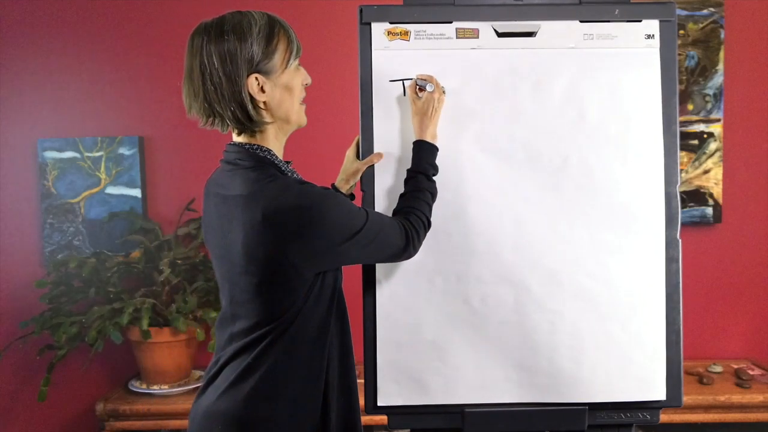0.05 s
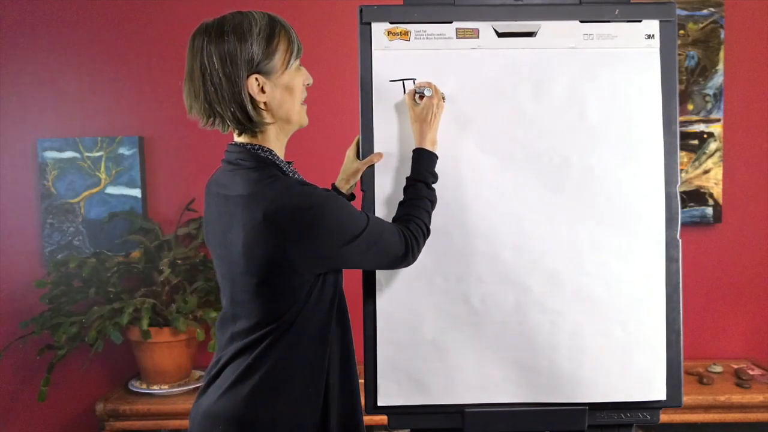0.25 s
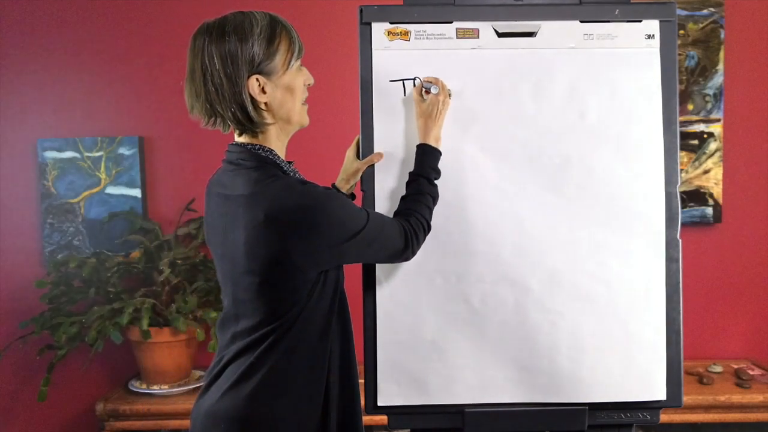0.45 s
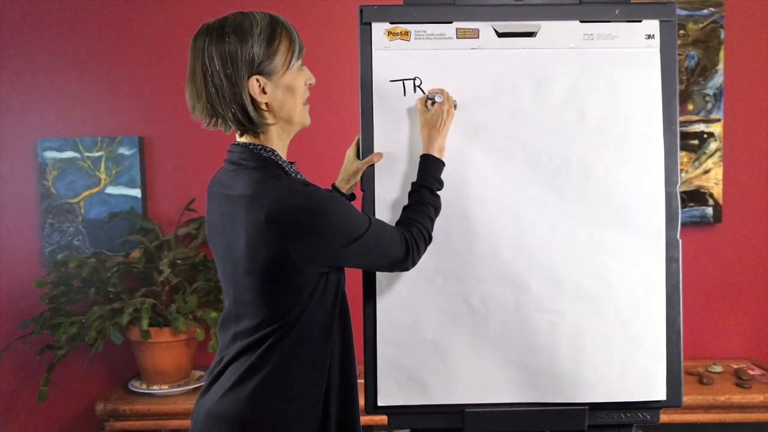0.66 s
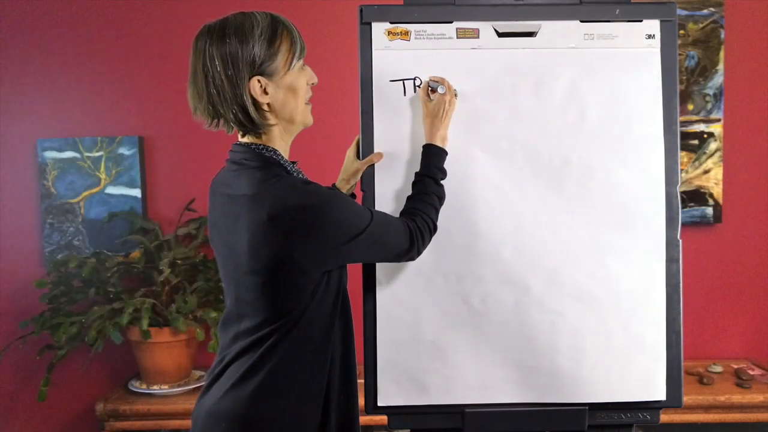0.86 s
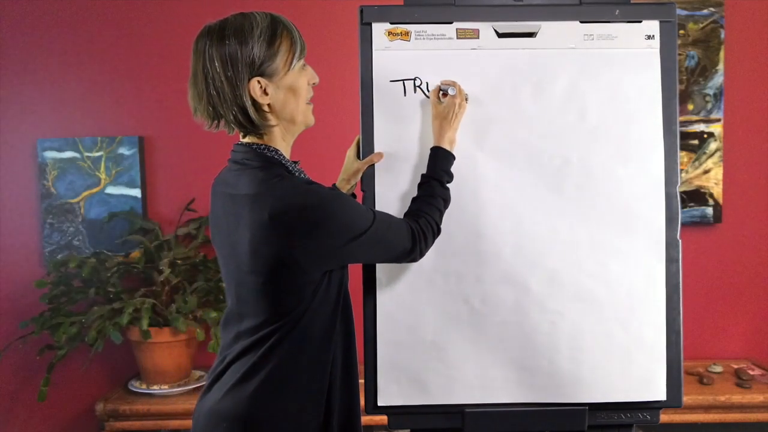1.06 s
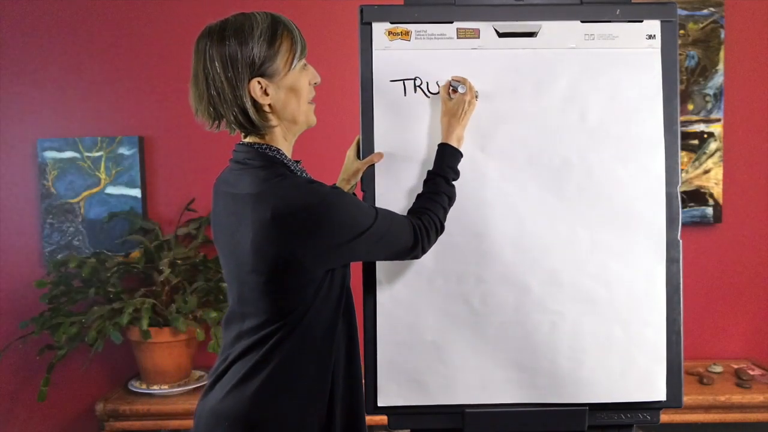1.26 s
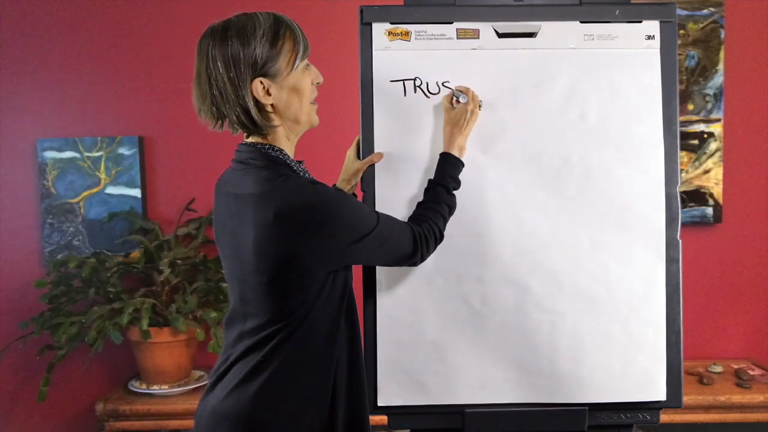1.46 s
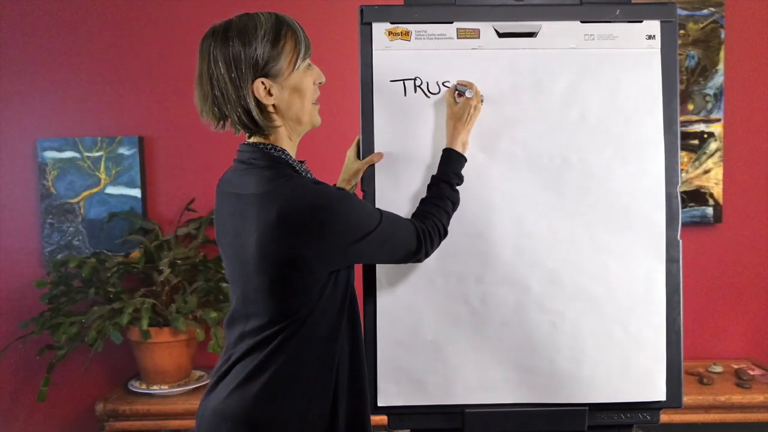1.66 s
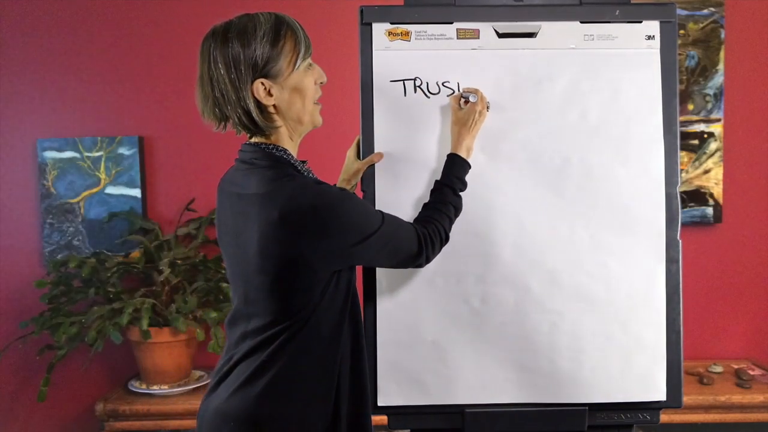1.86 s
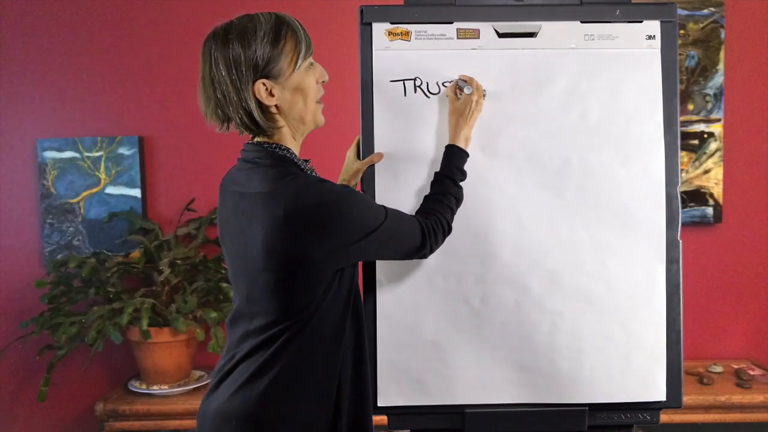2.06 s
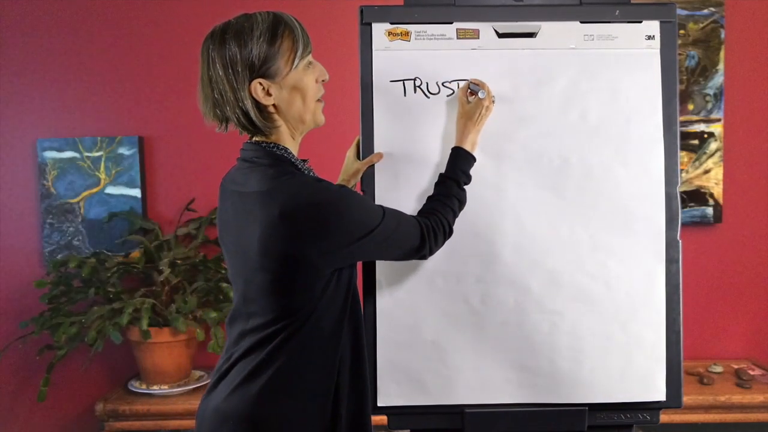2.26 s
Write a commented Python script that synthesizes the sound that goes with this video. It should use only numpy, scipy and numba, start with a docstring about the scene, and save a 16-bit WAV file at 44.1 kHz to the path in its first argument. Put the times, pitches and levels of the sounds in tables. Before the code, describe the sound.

A felt-tip marker scratches across a large paper pad in seven short, dry, hissy strokes with brief gaps, a soft knock of the pad midway, close and clear in a small room with faint ventilation hum.

```python
"""A felt-tip marker writes seven strokes on a paper pad on an easel: felt fibres stick and slip on the
paper grain, and this dense click noise excites resonances of the nib, the barrel, the sheet and the board.
Soft knocks of the pad are sums of decaying sines. A small room adds a tail of decaying noise.
Underneath lie wavering sine hum lines of the ventilation and steady filtered noise as rumble and hiss."""
import sys
import numpy as np
from scipy import signal
from scipy.fft import rfft, irfft
from scipy.io import wavfile
from scipy.ndimage import uniform_filter1d
from numba import njit

SR = 44100
rng = np.random.default_rng(int(sys.argv[2]) if len(sys.argv) > 2 else 0)


def persist_wave(psi):
    """Save psi, clipped to +-1, as 16-bit WAV."""
    counts = np.round(np.clip(psi, -1, 1) * 32767).astype(np.int16)
    wavfile.write(sys.argv[1], SR, np.atleast_2d(counts).T)


N = 102312

# Stereo width of the diffuse sound: (frequency [Hz], gain of the side signal [dB])
SIDE_WIDTH = [(60, -26), (700, -18), (3000, -21), (6000, -30), (15000, -36)]


def undb(db):
    """Decibel law: level to amplitude ratio."""
    return 10 ** (np.asarray(db) / 20)


def unit(x):
    """Normalisation by mean power: scale to an rms of 1."""
    return x / np.sqrt(np.mean(x ** 2))


@njit
def svf(x, hz, width):
    """State-variable resonator: band-pass whose centre and width [Hz] may move every sample."""
    y, band, low = np.empty(len(x)), 0., 0.
    for i in range(len(x)):
        g = np.tan(np.pi * hz[i] / SR)
        damping = width[i] / hz[i]
        v = (band + g * (x[i] - low)) / (1 + g * (g + damping))
        band, low = 2 * v - band, low + 2 * g * v
        y[i] = damping * v  # gain 1 at the centre
    return y


def ring(x, hz, width_hz):
    """Cascaded resonance: two equal band-passes give steep skirts; the rms is set to 1."""
    hz, width_hz = hz * np.ones(N), width_hz * np.ones(N)
    once = svf(x, hz, 1.58 * width_hz)  # each stage is wider, as the cascade narrows the band
    twice = svf(once, hz, 1.58 * width_hz)
    return unit(twice / np.sqrt(width_hz))  # noise power through a band grows with its width


def colour(x, table):
    """Linear filtering in the frequency domain, gain interpolated over log frequency."""
    hz = np.maximum(np.arange(N // 2 + 1) * SR / N, 1)
    points_hz, points_db = np.array(table, float).T
    gain_db = np.interp(np.log(hz), np.log(points_hz), points_db, left=-40)
    return irfft(rfft(x) * undb(gain_db), N)


def walk(rate):
    """Slow random modulation: random levels held 1 / rate s and smoothed by two moving averages."""
    hold = int(SR / rate)
    steps = np.repeat(rng.standard_normal(N // hold + 1), hold)
    smooth = uniform_filter1d(uniform_filter1d(steps, hold), hold)
    return 1.48 * smooth[:N]  # makes up for the swing lost in smoothing


def hum(t):
    """Tonal ventilation noise: sines with wandering phase and level."""
    # Ventilation hum: (frequency [Hz], mean level [dB rms])
    hum_lines = [(53.8, -52), (86.5, -54), (107.7, -57), (356, -67), (1316, -67)]
    waver_db, wander_cycles = 1.3, 0.078
    total = 0
    for hz, db in hum_lines:
        cycles = hz * t + rng.random() + wander_cycles * walk(5.54)
        amplitude = np.sqrt(2) * undb(db + waver_db * walk(4.98))
        total = total + amplitude * np.sin(2 * np.pi * cycles)
    return total


def air(t):
    """Superposed background: hum plus stationary noise shaped into rumble and hiss, as mid and side."""
    # Rumble and microphone hiss: (frequency [Hz], relative spectral level [dB])
    air_spectrum = [(18, -33), (30, -11), (75, -10), (130, -0.5), (238, -9.5), (628, -14.5), (981, -15),
                    (1310, -16.5), (1890, -26.5), (3450, -27), (4150, -30), (15800, -31.5)]
    air_db, hum_side_db = -47.5, -34.5  # noise level in the mid [dB rms]; hum in the side over the mid
    mid, side = (colour(rng.standard_normal(N), air_spectrum) for _ in range(2))
    gain = undb(air_db) / np.std(mid)
    lines = hum(t)
    side_hum = undb(hum_side_db) * np.roll(lines, 200)  # shifted 200 samples
    return lines + gain * mid, gain * colour(side, SIDE_WIDTH) + side_hum


def room_tail(near):
    """Diffuse reverberation: convolution with exponentially decaying noise."""
    t60_s, gap_s = 0.25, 0.004
    a = np.arange(SR // 2) / SR
    response = rng.standard_normal(len(a)) * undb(-60 * a / t60_s) * (a > gap_s)
    response = unit(response) / np.sqrt(len(a))  # total energy 1
    return signal.fftconvolve(near, response)[:N]


def taps(t):
    """Modal decay: soft knocks of the pad against its board as damped sines."""
    # Knocks: (time [s], level before the rise and the mode gains [dB], main pitch [Hz])
    knocks = [(1.5372, -27.5, 780), (1.5438, -26, 333), (2.028, -29.5, 1130), (2.042, -32, 1810)]
    # Modes of each knock: (ratio to the main pitch, gain [dB])
    modes = [(.6, -8), (1, 1.5), (1.4, -3.5)]
    t60_s, rise_s = 0.017, 0.0017
    out = 0
    for start, db, hz in knocks:
        a = np.maximum(t - start, 0)
        body = sum(undb(mode_db) * np.sin(2 * np.pi * ratio * hz * a) for ratio, mode_db in modes)
        envelope = undb(db - 60 * a / t60_s) * (1 - np.exp(-a / rise_s))
        out = out + envelope * body
    return out


def slips():
    """Stick-slip friction: fibres catching and letting go as dense clicks of scattered size."""
    slips_per_s, spread_db = 16650, 1
    size = undb(spread_db * np.minimum(rng.exponential(size=N), 4)) * rng.standard_normal(N)
    happens = np.clip((slips_per_s / SR - rng.random(N)) * 50, 0, 1)
    return size * happens


def sliding_notches(x, t):
    """Notch filtering, input minus band-pass: the upper notch likely comes from the echo off the pad,
    the lower is a wandering dip near 3.2 kHz that thins the scratch."""
    # Upper notch sliding as the hand moves: (time [s], centre [Hz])
    notch_path = [(.1, 10600), (.21, 10000), (.29, 10450), (.4, 10300), (.48, 10660), (.66, 10500),
                  (.73, 10200), (.93, 10570), (1.13, 10300), (1.3, 10370), (1.57, 9830), (2.2, 10300)]
    width_hz, low_ratio, low_wander = 860, 0.3135, 0.04
    upper_hz = np.interp(t, *np.array(notch_path).T)
    lower_hz = low_ratio * upper_hz * (1 + low_wander * walk(11.92))
    for notch_hz in (upper_hz, lower_hz):
        x = x - svf(x, notch_hz, width_hz * np.ones(N))
    return x


def nib_ring(x, excess_db):
    """Amplitude-dependent resonance: the nib ring narrows and drops as it rises over the scratch."""
    width_hz, narrowing_per_db = 1750, 0.17  # width at excess 0
    nib_hz, sag_hz_per_db, wander = 6560, 36.5, 0.013  # pitch at excess 0
    excess_db = np.clip(excess_db, -5, 14)
    width = width_hz * np.exp(-narrowing_per_db * excess_db)
    hz = (nib_hz - sag_hz_per_db * excess_db) * (1 + wander * walk(120))
    return ring(x, hz, width)


def barrel_ring(x):
    """Wandering resonance of the barrel, its band edges shaped by a filter."""
    # Band limits, with a steep upper side: (frequency [Hz], gain [dB])
    barrel_edge = [(700, 3), (2230, 0.5), (2600, -17.5)]
    barrel_hz, width_hz, wander = 1936, 520, 0.019
    hz = barrel_hz * (1 + wander * walk(25.1))
    return unit(colour(ring(x, hz, width_hz), barrel_edge))


def flicker():
    """Amplitude modulation: a random waver of level."""
    return undb(1.14 * walk(30.06))


def grazes(t):
    """Light contact: Gaussian envelopes for faint brushes of the tip."""
    # Grazes: (time [s], envelope length [s], gain [dB])
    brushes = [(0.05, 0.0026, -63), (0.864, 0.011, -53), (1.753, 0.0047, -53), (2.222, 0.023, -50)]
    return sum(undb(db) * np.exp(-((t - start) / length) ** 2) for start, length, db in brushes)


def marker(t):
    """Source-filter principle: one friction noise excites every resonance while the tip touches."""
    # One list per stroke: (time [s], scratch level [dB], nib ring level [dB], upper nib ring level [dB],
    # barrel ring level [dB], sheet ring level [dB])
    strokes = [
        [(0.092, -62, -58, -61, -61, -60), (0.102, -55, -49, -53, -49, -53),
         (0.128, -50.5, -46.5, -48, -53.5, -53.5), (0.2, -41.5, -41.5, -45, -48.5, -45),
         (0.222, -50, -34, -42, -50, -41), (0.232, -51, -53, -54, -52, -45), (0.242, -60, -60, -62, -67, -59)],
        [(0.266, -53, -53, -60, -67, -56), (0.278, -46, -44, -51, -56.5, -43.5),
         (0.33, -45, -35, -39, -46.5, -45), (0.376, -52, -47.5, -54, -56.5, -47),
         (0.456, -41, -39.5, -42, -43, -48), (0.496, -32.5, -26, -34, -59, -38),
         (0.538, -47.5, -38.5, -50, -44.5, -39.5), (0.552, -59, -63, -59, -51, -56)],
        [(0.576, -57, -54, -59, -61, -49), (0.592, -50, -46, -52, -46.5, -48),
         (0.628, -44, -44.5, -49, -48, -50), (0.664, -40.5, -39.5, -41.5, -46, -44),
         (0.724, -54.5, -49, -58, -58, -50), (0.738, -63, -60, -62, -71, -65)],
        [(0.894, -59, -64, -69, -55, -56), (0.91, -45.5, -42.5, -45, -41.5, -47.5),
         (0.94, -33.5, -33.5, -41, -47, -41), (0.984, -44, -45, -51, -44, -48.5),
         (1.03, -39.5, -33, -48, -61, -43), (1.066, -31.5, -24.5, -32.5, -39.5, -34.5),
         (1.126, -41, -42, -41, -41, -43), (1.165, -52.5, -47.5, -58, -66, -59)],
        [(1.282, -59, -60, -61, -54, -62), (1.298, -48, -50.5, -61, -47.5, -44.5),
         (1.38, -38, -31.5, -40, -63, -40), (1.406, -38, -38, -49, -47.5, -45),
         (1.474, -42.5, -41, -48, -49.5, -47), (1.518, -32.5, -28, -29, -45.5, -35),
         (1.562, -32, -23.5, -41, -83, -35), (1.572, -47, -40, -45, -53, -42)],
        [(1.772, -57, -57, -64, -56, -60), (1.784, -50, -46, -44.5, -47, -46.5),
         (1.804, -43, -40.5, -41, -46.5, -43.5), (1.85, -43, -41, -43, -47.5, -43.5),
         (1.874, -50, -44.5, -48, -46, -47.5), (1.9, -56, -60, -62, -60, -57)],
        [(2.022, -55, -61, -61, -68, -60), (2.042, -44, -40.5, -49, -39.5, -44),
         (2.058, -39.5, -34.5, -45, -53.5, -37), (2.114, -40.5, -35.5, -42.5, -51, -44.5),
         (2.148, -43, -37.5, -42.5, -48.5, -40), (2.17, -53, -50, -51, -44.5, -51),
         (2.18, -54, -55, -52, -50, -60)],
    ]
    # Treble scratch: (frequency [Hz], relative gain [dB])
    scratch_spectrum = [(2600, -13.5), (5400, -27.5), (8600, -7), (9300, -3.5), (11000, -2), (13000, -1),
                        (14800, -9.5), (15800, -14.5)]
    # Upper nib ring: (frequency [Hz], relative gain [dB])
    upper_spectrum = [(6600, -16), (7200, 1.5), (8200, 0), (8700, -8.5), (9200, -27.5)]
    # Sheet ring: (frequency [Hz], relative gain [dB])
    sheet_spectrum = [(2700, -19), (3300, -7.5), (3900, -1.5), (4700, 2.5), (5400, -8.5), (6000, -24.5)]
    # Board ring, one value per stroke: (level at a scratch of -43 dB [dB])
    board_levels = [-54, -53, -50, -50.5, -48, -51.5, -51.5]
    # Band under the nib ring, one value per stroke: (level over the scratch, before halving [dB])
    flank_levels = [-3, -5, -5, -12, -8, -14, -9]
    board_hz, board_width_hz, board_slope = 1210, 1570, 0.54  # slope in dB per dB of scratch
    flank_hz, flank_width_hz = 5650, 1050
    lift_s = 0.0072  # fade just before and after each stroke

    points = np.concatenate([np.array(s, float) for s in strokes])
    scratch_db, nib_db, upper_db, barrel_db, sheet_db = (
        np.interp(t, points[:, 0], levels) for levels in points.T[1:])
    touch = 0
    for s in strokes:
        inside = np.minimum(t - s[0][0], s[-1][0] - t)
        touch = touch + np.clip(inside / lift_s + 1, 0, 1)
    touch = np.minimum(touch, 1)
    # per-stroke levels are reached at each stroke's fourth point and glide between
    anchors = [s[3][0] for s in strokes]
    board_db = np.interp(t, anchors, board_levels) + board_slope * (scratch_db + 43)
    flank_db = scratch_db + np.interp(t, anchors, flank_levels)

    x = sliding_notches(slips(), t)
    scratch = unit(colour(x, scratch_spectrum))
    nib = nib_ring(x, nib_db - scratch_db)
    upper = unit(colour(x, upper_spectrum))
    barrel = barrel_ring(x)
    sheet = unit(colour(x, sheet_spectrum))
    board = undb(board_db) * ring(x, board_hz, board_width_hz)
    flank = undb(flank_db) * ring(x, flank_hz, flank_width_hz)

    writing = undb(scratch_db) * scratch + undb(nib_db) * nib + undb(barrel_db) * barrel
    writing = writing + undb(upper_db) * flicker() * upper
    writing = writing + undb(sheet_db) * flicker() * sheet
    writing = writing + flicker() * (board + flank / 2)  # these two flicker together
    return grazes(t) * (scratch + nib + sheet) / 2 + touch * writing


def scene():
    """Direct and diffuse field: central marker and knocks, with a slightly wide tail and background."""
    room_db, room_side_db = -15, 3  # tail gain; extra gain of the side tail before its width filter
    t = np.arange(N) / SR
    near = marker(t) + taps(t)
    mid, side = air(t)
    mid = mid + near + undb(room_db) * room_tail(near)
    side = side + undb(room_db + room_side_db) * colour(room_tail(near), SIDE_WIDTH)
    return np.array([mid + side, mid - side])


def record(dry):
    """Band limiting: the recorder's steep elliptic low-pass cuts the top above 15780 Hz."""
    low_pass = signal.ellip(16, .3, 70, 15780, fs=SR, output="sos")
    return signal.sosfilt(low_pass, dry)


dry = scene()
out = record(dry)
persist_wave(out)
```